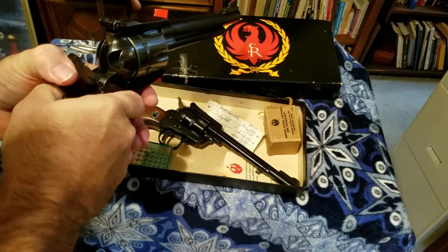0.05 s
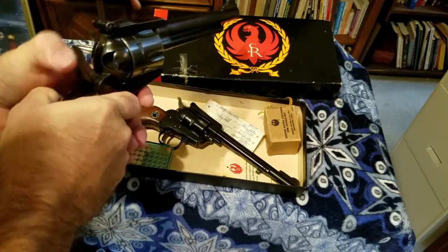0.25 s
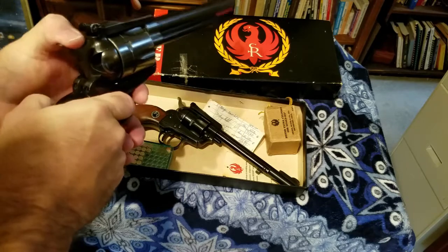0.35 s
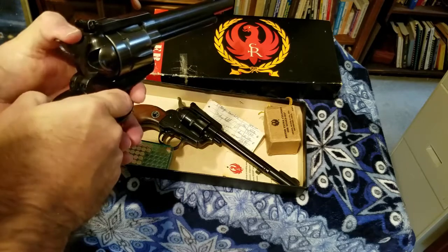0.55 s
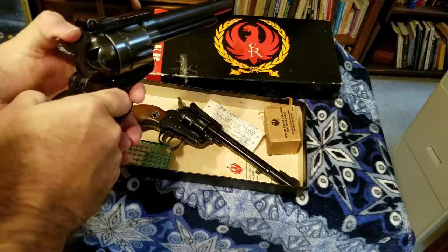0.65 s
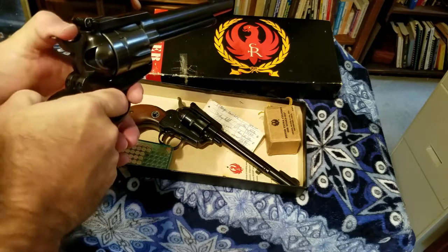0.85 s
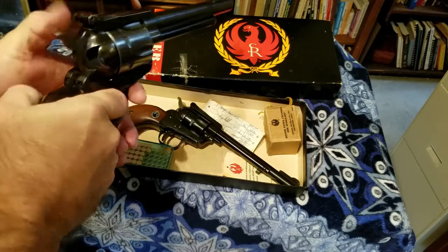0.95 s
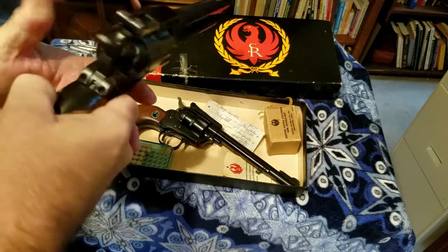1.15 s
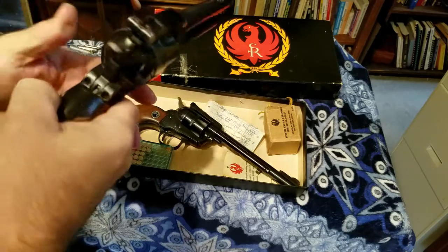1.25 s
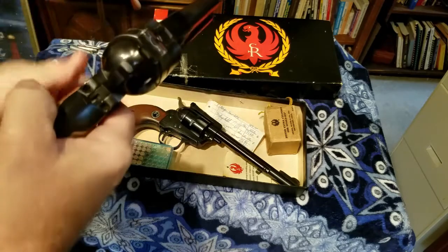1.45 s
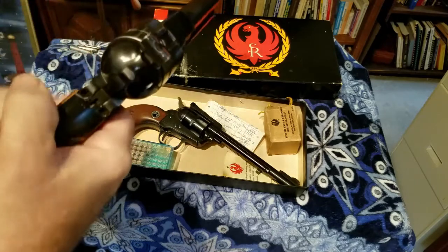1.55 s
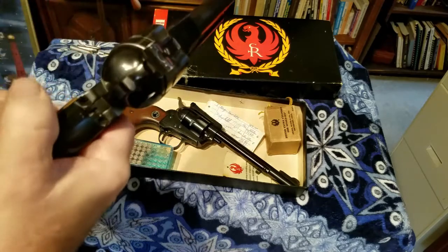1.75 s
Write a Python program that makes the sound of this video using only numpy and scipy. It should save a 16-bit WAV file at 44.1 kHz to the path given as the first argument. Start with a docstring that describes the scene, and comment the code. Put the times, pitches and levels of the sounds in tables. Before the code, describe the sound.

A revolver's action gives three sharp metallic clicks up close, with faint hand rustle.

```python
"""Three sharp clicks of a revolver's action, close to a stereo microphone in a small furnished room.
Each click is a cluster of steel-on-steel strikes that ring the gun's parts for a few milliseconds.
From the left come fainter ticks, thin squeaks, dull knocks, a hiss and the rustle of shifting hands.
The room answers with short reflections over steady room tone; gain control dips at the loud clicks."""
import sys
import numpy as np
from scipy import signal
from scipy.io import wavfile
from scipy.ndimage import uniform_filter1d

SR = 44100
rng = np.random.default_rng(int(sys.argv[2]) if len(sys.argv) > 2 else 0)


def inscribe(sig):
    """Save sig as 16-bit PCM at rate SR to the path in sys.argv[1].

    A 1-D sig is mono; a 2-D sig holds one channel per row.
    Samples are clipped to [-1, 1] before scaling.
    """
    pcm = np.round(np.clip(np.atleast_2d(sig).T, -1, 1) * 32767)
    wavfile.write(sys.argv[1], SR, pcm.astype(np.int16))


N = 79380
CONTACT_S = .0003  # how long steel touches steel
FRONT_LAG, LEFT_LAG = 9, 19  # delay of the right channel, in samples
FRONT_PAN_DB, LEFT_PAN_DB = 3.5, 12  # left channel over right


def revolver_action():
    """Clusters of strikes, with single parts ringing on; returns the body and the treble."""
    # strikes in the action: start_s, level_db, knock_modes_db, middle_modes_db, top_modes_db, t60_s
    strikes = [(.1755, -52, -12.5, 1.5, 6, 0.014), (.184, -71, -29, -15, -6, 0.021),
               (.1976, -55, -31, -20, -11, 0.012), (.2086, -29, -44, -18, 15, 0.0041),
               (.2108, -19.5, -20, -25, -7, 0.0068), (.2128, -19, -20, -7.5, -23, 0.0093),
               (.2163, -36, -17, 7.5, 1, 0.0065), (.2236, -18, -26, -23, 7.5, 0.0042),
               (.2292, -40, -37, -11, 3, 0.012), (.2327, -29.5, -19, -17, -3, 0.0077),
               (.4573, -35, -27, -23, -12, 0.014), (.4582, -30.5, -21, -7, -5, 0.0088),
               (.4641, -31.5, -48, -4.5, 0, 0.0057), (.4655, -53, -19.5, -23, 1, 0.0036),
               (.5838, -22.5, -19.5, -6, 1, 0.0056), (.5866, -26, -34, 2.5, -7, 0.0047),
               (.5888, -47, -46, -27, -8, 0.0031), (.5942, -33.5, -42, -34, -13, 0.0091),
               (.5958, -21, -51, -16, -15, 0.0041), (.598, -26.5, -30, -11, -11, 0.0041),
               (.8383, -56, 7, 5, -14, 0.0056), (1.7901, -45.5, -4, -1, -33, 0.0035)]
    # parts ringing after a strike: start_s, pitch_hz, level_db, t60_s
    ringing_parts = [(.2238, 1160, -46, 0.0094), (.2242, 2160, -35, 0.013), (.229, 14200, -32, .014),
                     (.4641, 5500, -33.5, 0.0047), (.5838, 15700, -23.5, 0.02), (.584, 15650, -53, 0.24)]
    knock, middle, main, top = struck_steel(strikes)
    return knock + middle, main + top + pings(ringing_parts)


def struck_steel(strikes):
    """Each brief contact rings the steel's modes, slightly detuned; one track per group of modes."""
    # steel modes, grouped as knock, middle, main and top: pitch_hz, level_db, t60_ratio
    steel_modes = [
        [(1510, -4, 0.72), (2300, 9, 0.98)],
        [(3280, 1.5, 0.43), (4610, -0.5, 0.43), (5666, -4.5, 0.86)],
        [(6530, -7.5, 1.09), (7460, -4, 1.33), (8203, 3, 1.04), (9140, -6, 1.59), (9930, -7.5, 1.51)],
        [(11050, -3.5, 0.72), (13000, -2.5, 0.69), (14200, -5.5, 0.48), (15700, -8, 0.88)],
    ]
    out, t = np.zeros((len(steel_modes), N)), np.arange(2000) / SR
    attack = np.minimum(t / CONTACT_S, 1)
    for start_s, db, knock_db, middle_db, top_db, t60 in strikes:
        for track, group, group_db in zip(out, steel_modes, (knock_db, middle_db, 0, top_db)):
            for hz, mode_db, t60_ratio in group:
                detune, jitter = rng.uniform(-1, 1, 2)
                decay = amp(db + group_db + mode_db - 60 * t / (t60_ratio * t60))
                tone = np.sin(2 * np.pi * hz * (1 + .03 * detune) * t)
                add(track, start_s + CONTACT_S * jitter, 2 * attack * decay * tone)
    return out


def pings(hits, attack_s=CONTACT_S):
    """Each hit rings one mode: a single decaying tone."""
    out, t = np.zeros(N), np.arange(SR // 2) / SR
    attack = np.minimum(t / attack_s, 1)
    for start_s, hz, db, t60 in hits:
        add(out, start_s, 2 * attack * amp(db - 60 * t / t60) * np.sin(2 * np.pi * hz * t))
    return out


def small_ticks():
    """Light contacts ring the upper steel modes, plus one longer ping of each tick's own."""
    # ticks: start_s, level_db, ping_hz, ping_db, middle_modes_db, top_modes_db, t60_s
    ticks = [(0.1593, -57, 5000, -20, -32, -10, 0.0071), (0.866, -67.5, 4000, 5, 1, -12, 0.011),
             (0.895, -61, 15100, 7, -15, 5, 0.0049), (1.0669, -62.5, 11960, 5, -17, 14, 0.006),
             (1.0911, -64, 8000, 8, -20, -17, .005), (1.1197, -41, 7850, 12.5, -27, -4, 0.0023),
             (1.1219, -45, 5640, 9, -3, -8, 0.0032), (1.1266, -47, 3100, -24, 4, -17, 0.011),
             (1.1465, -60, 1700, -4, 3.5, 4, 0.019), (1.153, -62, 12200, 0, 2, -1, .005),
             (1.1775, -44.5, 4730, 14.5, 9, -1, 0.0033), (1.1953, -65, 4760, 5, 2, -10, 0.0033),
             (1.2154, -45, 2710, -9.5, 0.5, -23, 0.0068), (1.2983, -61, 2370, -1, -8, -18, 0.0066),
             (1.3219, -46, 2420, -3, -2.5, -3, 0.0086), (1.541, -61, 5040, 4, -7, -8, 0.0034),
             (1.699, -59, 13500, -1, -17, 0, 0.0043)]
    strikes = [(s, db, -np.inf, middle_db, top_db, t60) for s, db, _, _, middle_db, top_db, t60 in ticks]
    own_pings = [(s, hz, db + ping_db, 1.32 * t60) for s, db, hz, ping_db, _, _, t60 in ticks]
    return struck_steel(strikes).sum(0) + pings(own_pings)


def knocks(t60_s=0.012):
    """Short low thuds with a soft attack."""
    # dull knocks: start_s, level_db, pitch_hz
    thuds = [(.224, -47.5, 177), (0.226, -45, 444), (0.582, -50, 157.5), (0.611, -43, 366),
             (.624, -39, 393), (0.642, -44.5, 352), (1.178, -58.5, 320)]
    return pings([(s, hz, db, t60_s) for s, db, hz in thuds], attack_s=0.0015)


def rumble(pitch_hz=332.5, width_hz=103, bumps_per_s=120):
    """Small random bumps ring one low, damped resonance."""
    # rumble loudness: time_s, level_db
    rumble_level = [(0.0, -70.5), (0.19, -78.5), (0.224, -66), (0.264, -79), (0.556, -70.5), (0.62, -60),
                    (0.676, -68), (1.198, -71.5), (1.208, -91), (1.8, -109)]
    t = np.arange(3000) / SR
    bumps = rng.standard_normal(N) * (rng.random(N) < bumps_per_s / SR)
    resonance = t * np.exp(-np.pi * width_hz * t) * np.sin(2 * np.pi * pitch_hz * t)
    return fader(rumble_level) * unit_rms(signal.oaconvolve(bumps, resonance)[:N])


def squeaks(pitch_waver=.005, flutter_db=3):
    """Thin gliding whistles that waver in pitch and level."""
    # squeaks: start_s, end_s, first_hz, middle_hz, last_hz, level_db
    glides = [(.69, .75, 12100, 11650, 11900, -73), (.752, .83, 12100, 12150, 12200, -72),
              (.82, .9, 12250, 11300, 10500, -73), (.75, .87, 10150, 9700, 8500, -71),
              (.69, .75, 15300, 14500, 15000, -73), (.78, .87, 14700, 14450, 13600, -75),
              (.855, .89, 15800, 15100, 14300, -70), (.9, .94, 14200, 15300, 15600, -71),
              (.92, 1.06, 13000, 13300, 13200, -73), (.94, 1.03, 14800, 14600, 15100, -69)]
    out = np.zeros(N)
    for start_s, end_s, first_hz, middle_hz, last_hz, db in glides:
        progress = np.linspace(0, 1, round((end_s - start_s) * SR))
        hz = np.polyval(np.polyfit([0, .5, 1], [first_hz, middle_hz, last_hz], 2), progress)
        drifts = uniform_filter1d(rng.standard_normal((2, 8000)), size=400)
        waver, flutter = (unit_rms(drift)[:len(progress)] for drift in drifts)
        tone = np.sin(2 * np.pi * np.cumsum(hz * (1 + pitch_waver * waver)) / SR)
        swell = np.sqrt(np.sin(np.pi * progress).clip(0))
        add(out, start_s, amp(db + flutter_db * flutter) * swell * tone)
    return out


def hiss():
    """A hiss that fades and swells, peaked near 8 kHz by the microphone."""
    # hiss colour: frequency_hz, relative_db
    spectrum = [(1000, -34), (3000, -17.5), (5000, -20.5), (6800, -14), (8300, 1.5), (10200, -17),
                (12500, -20.5), (15800, -29)]
    # hiss loudness: time_s, level_db
    hiss_level = [(0, -66.5), (.15, -68), (.4, -105), (.7, -65), (1.0, -68.5), (1.3, -69.5), (1.45, -60.5),
                  (1.55, -60), (1.7, -66.5), (1.8, -66.5)]
    return fader(hiss_level) * stereo_noise(spectrum)[0]


def hand_rustle():
    """Soft broad noise while the hands shift."""
    # rustle colour: frequency_hz, relative_db
    spectrum = [(500, -0.5), (1300, -5), (2200, -3), (3500, -12), (6000, -9), (10000, -21.5), (15800, -9)]
    # rustle loudness: time_s, level_db
    rustle_level = [(.5, -73.5), (.65, -62.5), (.8, -67.5), (.86, -67), (.92, -71), (1.05, -69.5),
                    (1.15, -108)]
    return fader(rustle_level) * stereo_noise(spectrum)[0]


def room_reflections(sound, delay_s=0.0033):
    """Sparse reflections off nearby surfaces, each band dying at its own speed."""
    # room decay: frequency_hz, t60_s
    decay = [(500, 0.15), (1300, 0.32), (3500, 0.28), (9000, 0.27), (16000, 0.19)]
    # colour of the reflections: frequency_hz, relative_db
    colour = [(500, 17), (2000, 0.5), (4500, 3.5), (8000, 2.5), (12000, 2.5), (16000, 1.5)]
    # left-right likeness of the reflections: frequency_hz, correlation
    likeness = [(500, 0.14), (4000, 0.033), (6500, 0.89), (16000, 1)]
    taps = np.zeros((2, SR // 2))
    slots = np.arange(round(delay_s * SR), SR // 2 - 20, 20)
    arrivals = slots + rng.integers(0, 20, (2, len(slots)))
    np.put_along_axis(taps, arrivals, rng.standard_normal(arrivals.shape), 1)
    hz, t, spectra = signal.stft(taps, SR, nperseg=128)
    fade = amp(per_band(colour, hz) - 60 * t / per_band(decay, hz))
    tail = signal.istft(paired(spectra, per_band(likeness, hz)) * fade, SR, nperseg=128)[1]
    return signal.fftconvolve(sound[None], tail / np.linalg.norm(tail[0]), axes=1)[:, :N]


def room_tone():
    """The room's faint steady noise, strongest in the bass."""
    # room tone colour: frequency_hz, relative_db
    spectrum = [(25, -30), (60, 2.5), (135, -5), (320, -7), (600, -13.5), (1000, -14.5), (2200, -16.5),
                (3500, -20.5), (5500, -19.5), (8300, -21), (11000, -20.5), (15800, -24)]
    return amp(-66.5) * stereo_noise(spectrum)


def stereo_noise(spectrum, patchy_db=1.5):
    """Coloured noise at unit RMS, with drifting louder and softer patches."""
    # left-right likeness of the noise: frequency_hz, correlation
    likeness = [(60, 0.75), (300, 0.27), (1000, 0.067), (4000, 0.098), (8000, 1), (15000, 0.44)]
    frames, hz = N // 128 + 5, np.fft.rfftfreq(512, 1 / SR)
    a, b, c, d, patches = rng.standard_normal((frames, 257, 5)).T
    patches = uniform_filter1d(patches, size=8, axis=0)  # across frequency
    patches = unit_rms(uniform_filter1d(patches, size=16, axis=1))  # across time
    spectra = paired([a + 1j * b, c + 1j * d], per_band(likeness, hz))
    spectra *= amp(per_band(spectrum, hz) + patchy_db * patches)
    return unit_rms(signal.istft(spectra, nperseg=512, noverlap=384)[1][:, :N])


def amp(db):
    return 10 ** (np.asarray(db) / 20)


def unit_rms(x):
    return x / np.sqrt(np.mean(x ** 2) + 1e-20)


def fader(points):
    """Gain at every sample from (time_s, level_db) points."""
    return amp(np.interp(np.arange(N) / SR, *np.transpose(points)))


def per_band(points, hz):
    """A curve interpolated over log frequency, one row per band."""
    point_hz, value = np.transpose(points)
    return np.interp(np.log(hz + 1), np.log(point_hz + 1), value)[:, None]


def add(track, start_s, sound):
    part = track[round(start_s * SR):][:len(sound)]
    part += sound[:len(part)]


def placed(x, pan_db, lag):
    """The right channel is softer and lag samples later."""
    return np.array([x * amp(pan_db / 2), np.r_[np.zeros(lag), x[:N - lag]] * amp(-pan_db / 2)])


def paired(spectra, correlation):
    """Left and right channels of the given likeness, from two independent spectra."""
    left, other = spectra
    return np.array([left, correlation * left + np.sqrt(1 - correlation ** 2) * other])


def scene():
    """The revolver close in front, the small sounds off to the left, the room all around."""
    body, treble = revolver_action()
    ticks = small_ticks()
    reflections = room_reflections(amp(-4.5) * (body + treble) + amp(-11.5) * ticks)
    # the clicks' treble sounds in step in both channels
    front = placed(treble, FRONT_PAN_DB, lag=0)
    # the body and a weaker share of treble sound slightly later on the right
    front += placed(body + amp(-7.5) * treble, FRONT_PAN_DB, FRONT_LAG)
    left = placed(ticks + squeaks(), LEFT_PAN_DB, LEFT_LAG)
    left += placed(knocks() + rumble(), pan_db=7, lag=FRONT_LAG)
    left += placed(hiss() + hand_rustle(), LEFT_PAN_DB, LEFT_LAG)
    return front + left + reflections + room_tone()


def record(dry, threshold_db=-26, cutoff_hz=16100):
    """Gain control turns everything down at loud clicks and recovers slowly; then a low-pass."""
    power_db = 10 * np.log10(abs(uniform_filter1d((dry ** 2).mean(0), 400)) + 1e-12)
    fall_db = 45 * np.arange(N) / SR  # the held peak falls 45 dB a second
    held_db = np.maximum.accumulate(power_db + fall_db) - fall_db
    over_db = np.maximum(held_db - threshold_db, 0)
    ducked = dry / amp(0.19 * uniform_filter1d(over_db, 200))
    lowpass = signal.firwin(511, cutoff_hz, window=("kaiser", 9), fs=SR)
    return signal.oaconvolve(ducked, lowpass[None], "same")


dry = scene()
out = record(dry)
inscribe(out)
```